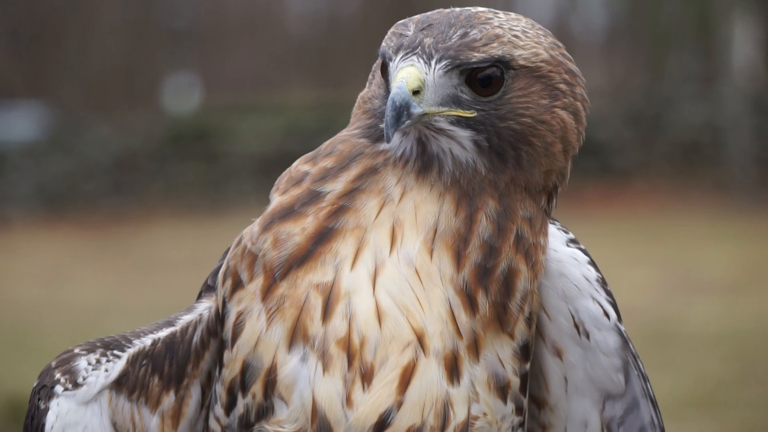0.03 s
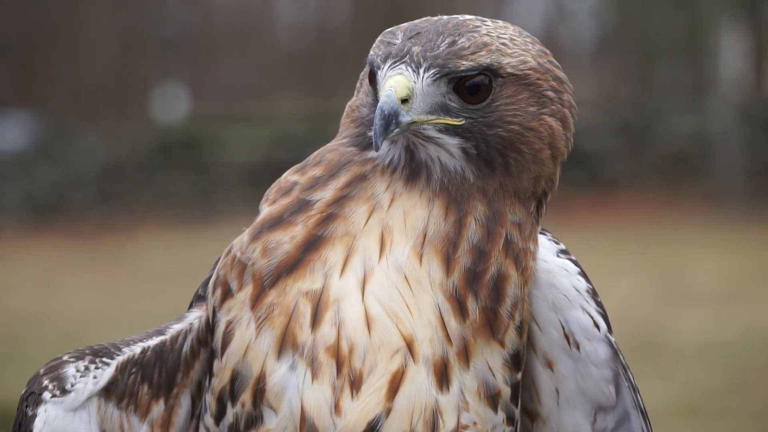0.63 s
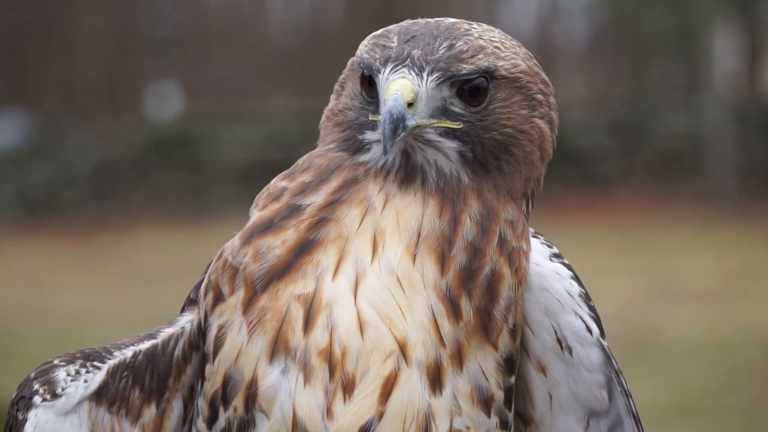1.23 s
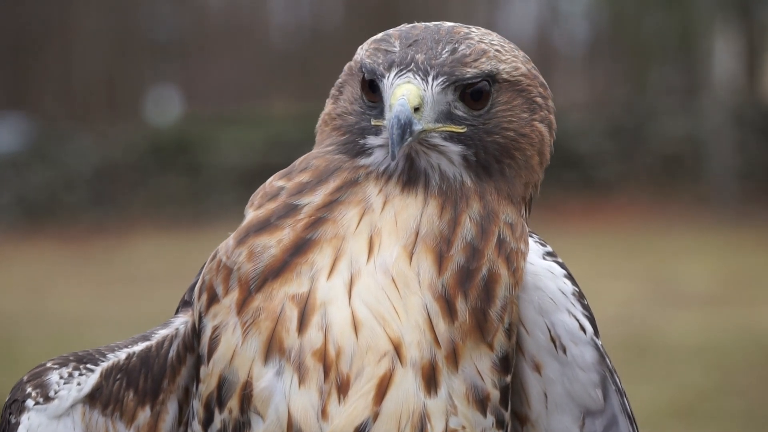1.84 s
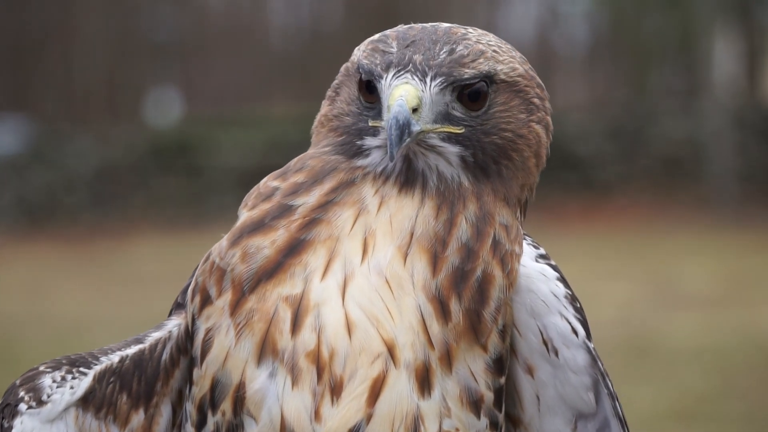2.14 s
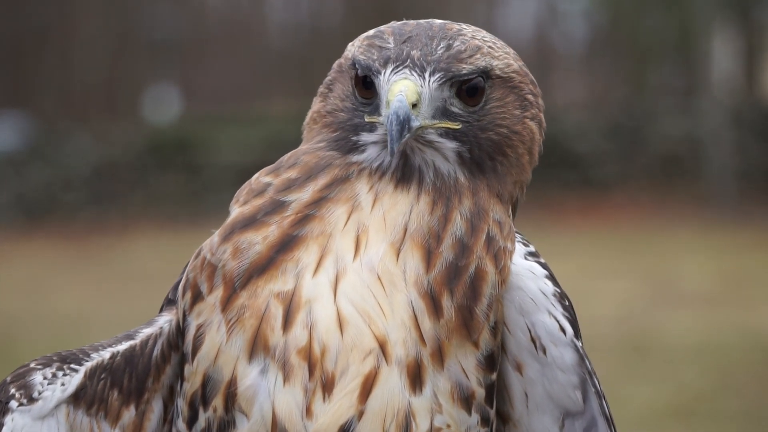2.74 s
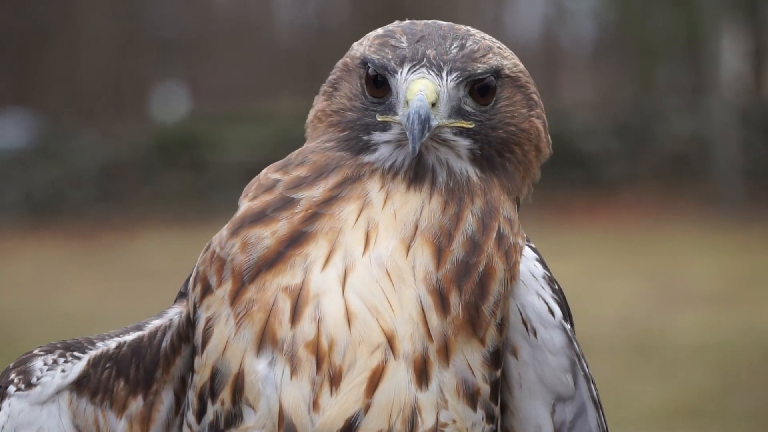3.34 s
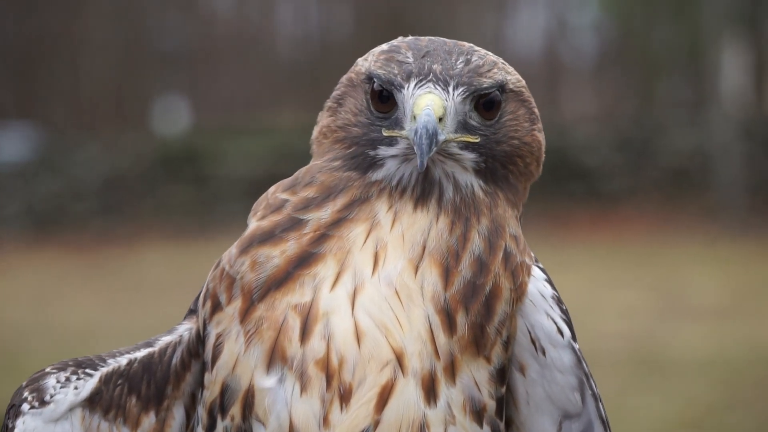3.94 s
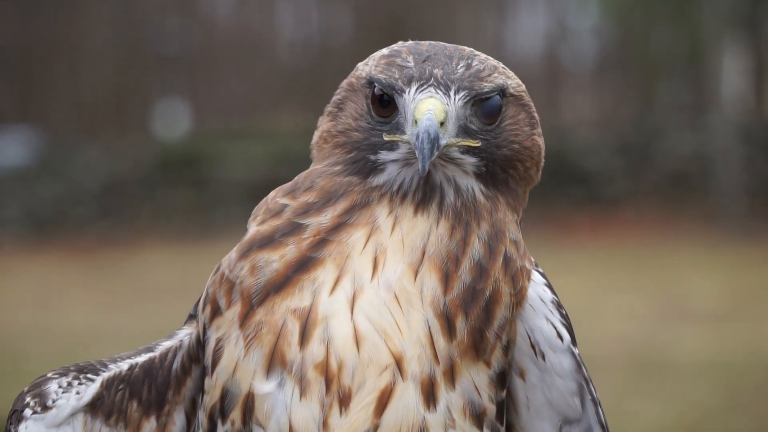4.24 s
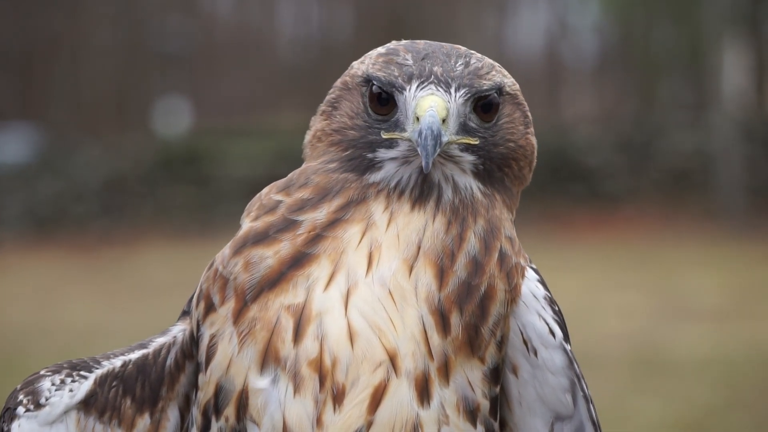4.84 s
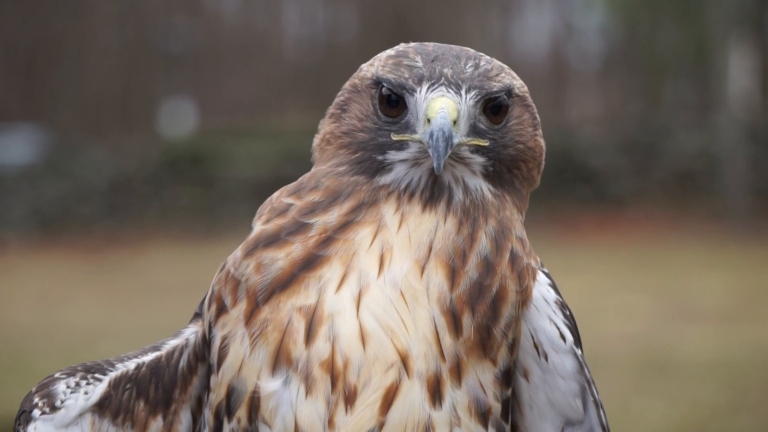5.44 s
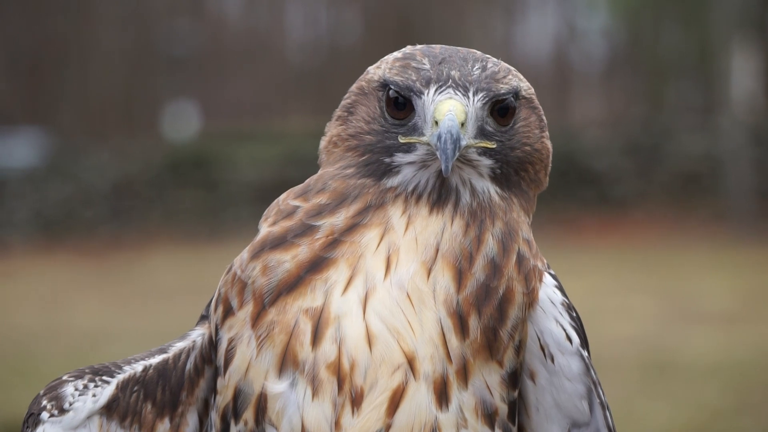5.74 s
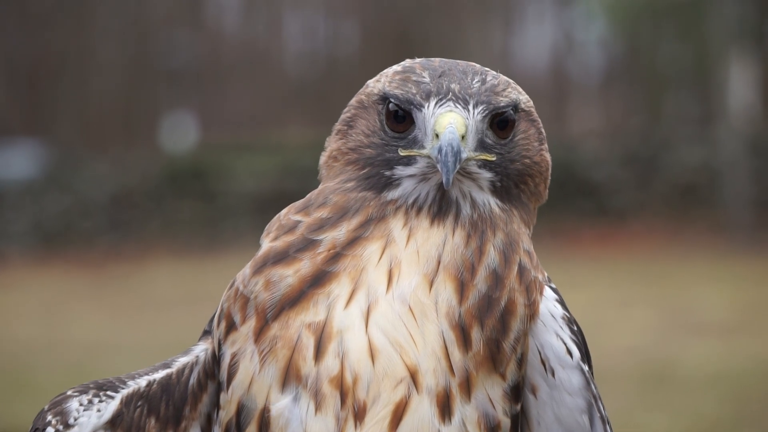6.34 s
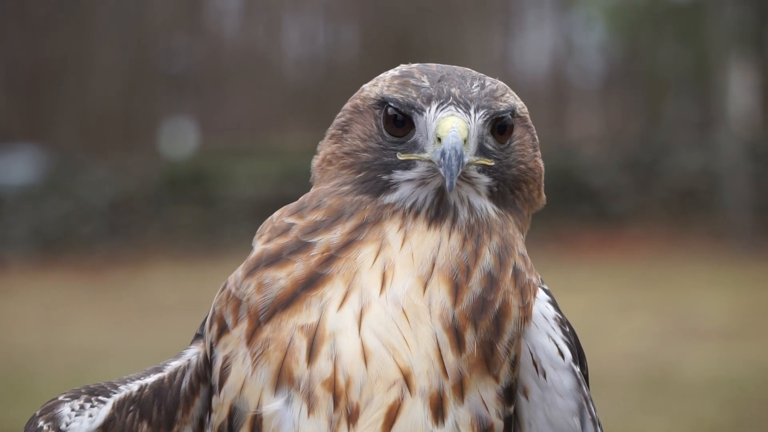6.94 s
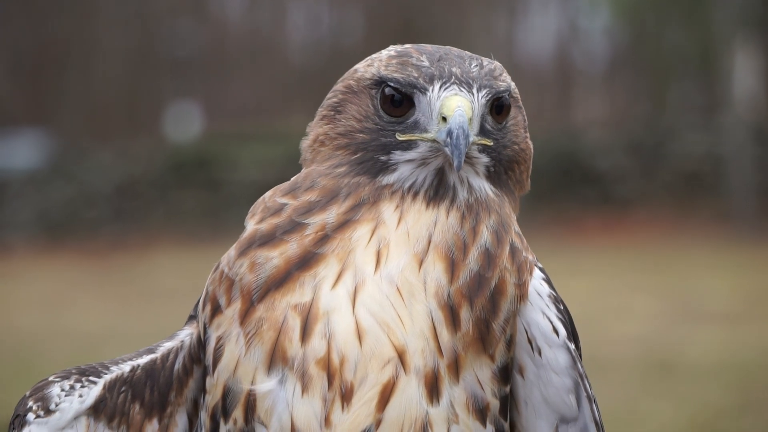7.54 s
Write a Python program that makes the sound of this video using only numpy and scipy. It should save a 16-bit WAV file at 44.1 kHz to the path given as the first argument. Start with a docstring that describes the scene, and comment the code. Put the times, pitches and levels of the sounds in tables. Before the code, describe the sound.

Far traffic hums steadily under a thin high whine, until growing gusts of wind thump and rumble on the microphone.

```python
"""Far traffic and a gusting breeze in a quiet field, on a camera's built-in stereo microphone.
Distant engines rumble and tyres roar. Right at the microphone, the camera whines thinly, its shell
clicks once as the sound fades in, and its lens drive stirs now and then.
The breeze builds until its eddies buffet the two ports, and the last gust ducks the gain control."""
import sys
import numpy as np
from scipy import signal
from scipy.fft import rfft, irfft
from scipy.io import wavfile
from scipy.ndimage import uniform_filter1d

SR = 44100
rng = np.random.default_rng(int(sys.argv[2]) if len(sys.argv) > 2 else 0)


def inscribe(sig):
    """Save sig as 16-bit PCM at rate SR to the path in sys.argv[1].

    A 1-D sig is mono; a 2-D sig holds one channel per row.
    Samples are clipped to [-1, 1] before scaling.
    """
    pcm = np.round(np.clip(np.atleast_2d(sig).T, -1, 1) * 32767)
    wavfile.write(sys.argv[1], SR, pcm.astype(np.int16))


N = 334719
TIME, FREQS = np.arange(N) / SR, np.fft.rfftfreq(N, 1 / SR)


def amp(db):
    """Decibels to gain."""
    return 10 ** (np.asarray(db) / 20)


def unit_rms(x):
    """Scales to rms 1."""
    return x / np.sqrt(np.mean(x ** 2) + 1e-20)


def curve_at(points, hz):
    """Reads a table on a log-frequency axis."""
    f, value = np.transpose(points)
    return np.interp(np.log(hz + 1), np.log(f + 1), value)


def smooth(x, seconds):
    """Triangular running mean."""
    size = max(1, int(seconds * SR))
    return uniform_filter1d(uniform_filter1d(x, size), size)


def coloured(x, spectrum):
    """Filters x by a table of f/Hz, level/dB and scales it to rms 1."""
    return unit_rms(irfft(rfft(x) * amp(curve_at(spectrum, FREQS)), N))


def noise_band(hz, half_width_hz):
    """Noise ringing in one resonance."""
    return unit_rms(irfft(rfft(rng.standard_normal(N)) / (1 + ((FREQS - hz) / half_width_hz) ** 2), N))


def stft_grid(size):
    """Times and frequencies of the short-time spectra."""
    hop = size // 4
    return np.arange(N // hop + 5) * hop / SR, np.fft.rfftfreq(size, 1 / SR)


def port_noise(shape_db, coherence, size):
    """Noise of rms 1 at the two microphone ports, from frames x bins levels and a coherence per bin."""
    a, b, c, d = rng.standard_normal((4, *shape_db.shape))
    coherence = np.clip(coherence, -1, 1)
    mid = np.sqrt(1 + coherence) * (a + 1j * b)
    side = np.sqrt(1 - coherence) * (c + 1j * d)
    spectra = np.array([mid + side, mid - side]) * amp(shape_db)
    _, noise = signal.istft(spectra.transpose(0, 2, 1), nperseg=size, noverlap=size - size // 4)
    return unit_rms(noise[:, :N])


# far traffic across the field: f/Hz, relative level/dB
TRAFFIC_SPECTRUM = [(10, -18.5), (38, -1), (70, -2), (130, -8.5), (230, -7.5), (300, -16), (540, -23.5),
                    (930, -19.5), (1400, -26.5), (3100, -42), (9000, -45.5), (11700, -76)]
# its likeness at the two ports: f/Hz, coherence
TRAFFIC_COHERENCE = [(25, 1), (150, 1), (290, 0.91), (640, 0.55), (1400, 0.3), (3000, -0.25), (7000, -0.13),
                     (15000, -0.35)]
# its lean in the stereo image: f/Hz, left minus right/dB
TRAFFIC_BALANCE = [(250, 0), (700, -1.5), (1300, -2.5), (2300, -3), (4400, 0.5), (15000, -1)]
# distant engines: f/Hz, half-width/Hz, level/dB
ENGINE_DRONES = [(76, 8.7, -48), (240, 4.5, -51), (602, 5, -71.5), (1380, 10, -71.5)]


def traffic(roar_db=-40, patchy_db=0.8, swell_db=0.3):
    """Far engine rumble and tyre roar, drifting in patches as the air carries them."""
    t, hz = stft_grid(size=4096)
    patches = uniform_filter1d(rng.standard_normal((len(t), len(hz))), size=6, axis=0)
    patches = unit_rms(uniform_filter1d(patches, size=30, axis=1))
    swell = unit_rms(uniform_filter1d(rng.standard_normal(len(t)), size=10))[:, None]
    drift_db = (patchy_db * patches + swell_db * swell) / (1 + (hz / 2500) ** 4)  # the treble stays even
    roar = port_noise(curve_at(TRAFFIC_SPECTRUM, hz) + drift_db, curve_at(TRAFFIC_COHERENCE, hz), 4096)
    lean_db = curve_at(TRAFFIC_BALANCE, FREQS) / 2
    drone = sum(amp(db) * noise_band(f, width) for f, width, db in ENGINE_DRONES)
    return amp(roar_db) * irfft(rfft(roar) * amp([lean_db, -lean_db]), N) + drone


# frame tick inside the camera: f/Hz, relative level/dB
TICK_SPECTRUM = [(3000, -45), (9000, -23), (10200, -5), (11500, -31), (14000, -15), (14450, 2),
                 (15700, -11)]


def electronics(frame_hz=59.94, whine_hz=13606, whine_db=-65, tick_db=-70.5, hiss_db=-62):
    """Each picture frame starts with a tick and a burst of whine, over the microphone's steady hiss."""
    frame_phase = TIME * frame_hz % 1
    gate = smooth(1. * ((frame_phase > .05) & (frame_phase < .64)), .0008)
    whine = unit_rms(gate * np.sin(2 * np.pi * whine_hz * TIME)) + .5 * noise_band(whine_hz, 130)
    whine = whine * amp([[-13], [0]])  # whine and ticks sit to the right
    frame_starts = 1. * (np.diff(frame_phase, prepend=0) < 0)
    ticks = coloured(frame_starts, TICK_SPECTRUM) * amp([[-7], [0]])
    hiss_spectrum = [(7000, -25.5), (9500, -2.5), (12500, -0.5), (15700, -1.5)]
    hiss = coloured(rng.standard_normal((2, N)), hiss_spectrum)
    return amp(whine_db) * whine + amp(tick_db) * ticks + amp(hiss_db) * hiss


# modes of the shell around the microphone: f/Hz, left gain/dB, right gain/dB, t60/s
SHELL_MODES = [(1250, -13, -18, .014), (1900, -14, -12, .006), (2590, -13, -2, 0.0062),
               (3650, -11, 0, 0.0059), (6500, 0, -4, 0.0068), (7600, 0, 3, 0.0039), (9200, -13, -4, 0.0027),
               (12400, -8, 10, 0.002), (14600, -7, 3, .0025)]


def click(at_s=.1931, level_db=-32.5, bounce_s=0.000644, bounce_force=0.27):
    """A catch on the camera snaps and bounces once, ringing the plastic shell."""
    out = np.zeros((2, N))
    for start, force in ((at_s, 1), (at_s + bounce_s, bounce_force)):
        t = np.clip(TIME - start, 0, .1)
        for hz, left_db, right_db, t60 in SHELL_MODES:
            ring = np.sin(2 * np.pi * hz * t) * np.exp(-np.log(1000) * t / t60)
            out += force * amp([[left_db], [right_db]]) * ring
    return amp(level_db) * out


# faint lens moves beside the microphone: t/s, length/s, rasp level/dB, rasp f/Hz, body f/Hz
LENS_STIRS = [(.874, 0.04, -60, 12600, 2700), (2.23, .05, -63, 12400, 2500), (2.85, .15, -66, 11200, 3900),
              (4.94, .14, -66, 11200, 3900), (5.805, .07, -60.5, 10100, 4180),
              (6.904, 0.15, -65, 11200, 3900)]


def lens(quick_s=0.057, rasp_half_width_hz=1800, body_half_width_hz=950, body_share=0.69):
    """Short soft rasps of the lens drive; the quicker the stir, the harsher."""
    out = np.zeros((2, N))
    for at_s, length, db, rasp_hz, body_hz in LENS_STIRS:
        stroke = np.exp(-(2 * (TIME - at_s) / length) ** 2)
        harshness = quick_s / length
        for channel in out:
            rasp = noise_band(rasp_hz, harshness * rasp_half_width_hz)
            body = harshness * body_share * noise_band(body_hz, body_half_width_hz)
            channel += amp(db) * stroke * (rasp + body)
    return out


STRONG_GUST_DB = -15.5  # gust timing and eddy pitch are scaled from this level
# gusts at the microphone: arrival t/s, hold/s, level/dB
WIND_GUSTS = [(4.056, .11, -34), (4.459, 0.15, -30.5), (4.83, 0.44, -34), (5.399, 0.25, -29),
              (5.993, 0.049, -32.5), (6.899, 0.097, -26), (7.115, 0.12, -17), (7.308, .042, -11.5),
              (7.383, 0.071, -14.5), (7.514, 0.1, -20.5)]


def wind_strength(t, breeze_db=-43, start_s=2.3, build_s=0.91, attack_s=0.018, release_s=0.033):
    """A faint breeze builds and steadies; gusts swell, hold and die away on top of it."""
    breeze = amp(breeze_db) * np.clip((t - start_s) / build_s, .1, 1)
    power = breeze ** 2
    for arrival, hold, db in WIND_GUSTS:
        slowing = 2 ** (0.0728 * (STRONG_GUST_DB - db))  # gentler gusts come and go more slowly
        before, after = np.maximum(arrival - t, 0), np.maximum(t - arrival - hold, 0)
        gust = amp(db) * np.exp(-(before / attack_s + after / release_s) / slowing)
        power += gust ** 2
    return np.sqrt(power)


def gust_fronts(t, lag_s=0.017, width_s=0.028, octaves=0.24):
    """Pitch rise in octaves from the smaller eddies at the front of each gust."""
    return octaves * sum(np.exp(-((t - at_s - lag_s) / width_s) ** 2) * min(amp(db - STRONG_GUST_DB), 1)
                         for at_s, _, db in WIND_GUSTS)


# buffeting on the microphone in a strong gust: f/Hz, relative level/dB
BUFFET_SPECTRUM = [(10, -30), (22, -10), (70, 2.5), (140, 1.5), (255, -8.5), (455, -24), (680, -40),
                   (1000, -44), (2000, -96)]
# direction of the breeze: t/s, eddy travel time from left port to right/s
PORT_CROSSING = [(4.5, -.0004), (5.5, .0002), (6.8, 0.0013), (7.4, .0012), (7.52, -0.00088)]


def wind(octaves_per_db=0.0571, shared_below_hz=700, low_cut_hz=32, eddy_s=0.021, veer_s=0.001):
    """Eddies sweep over one port and then the other; faster air makes smaller, higher eddies."""
    t, hz = stft_grid(size=1024)
    octaves = octaves_per_db * (20 * np.log10(wind_strength(t)) - STRONG_GUST_DB) + gust_fronts(t)
    shape_db = curve_at(BUFFET_SPECTRUM, hz / 2 ** octaves[:, None])
    coherence = 1 / (1 + (hz / shared_below_hz) ** 2)  # small eddies reach one port only
    eddies = port_noise(shape_db, coherence, size=1024)
    eddies = signal.sosfilt(signal.butter(2, low_cut_hz, "high", fs=SR, output="sos"), eddies)
    eddies /= np.sqrt(smooth((eddies ** 2).mean(0), eddy_s) + 1e-9)  # wind strength alone sets the level
    left, right = wind_strength(TIME) * eddies + thumps()
    veer = unit_rms(smooth(rng.standard_normal(N), 0.058))
    delay = np.interp(TIME, *np.transpose(PORT_CROSSING)) + veer_s * veer
    return np.array([np.interp(TIME + delay / 2, TIME, left), np.interp(TIME - delay / 2, TIME, right)])


# single large eddies on the microphone: t/s, envelope level/dB, f/Hz
LARGE_EDDIES = [(3.954, -23, 65), (4.467, -22, 85), (4.564, -20.5, 95), (5.173, -23.5, 115),
                (5.565, -21, 140), (6.151, -22, 66), (6.767, -20, 60), (6.865, -14, 80), (7.114, -12, 91),
                (7.405, -5.5, 240), (7.463, -11.5, 85)]


def thumps(width_cycles=0.56):
    """A large eddy sucks at the ports and then pushes."""
    out = np.zeros(N)
    for at_s, db, hz in LARGE_EDDIES:
        cycles = (TIME - at_s) * hz
        out += amp(db) * np.sin(2 * np.pi * cycles) * np.exp(-(cycles / width_cycles) ** 2)
    return out


def scene():
    """The far road, the wind on the microphone and the camera's own noises, in stereo."""
    return traffic() + wind() + electronics() + click() + lens()


def record(dry, limit_db=-18.5, squeeze=.95, attack_s=0.015, recover_db_per_s=18, edge_hz=15760):
    """The camera's input fades in, its gain control ducks under strong gusts, and the top is cut."""
    fade_in = 1 - np.exp(-np.maximum(TIME - 0.045, 0) / 0.094)
    power_db = 10 * np.log10(abs(smooth((dry ** 2).mean(0), 0.014)) + 1e-12)
    recovery_db = TIME * recover_db_per_s
    held_db = np.maximum.accumulate(power_db + recovery_db) - recovery_db
    over_db = np.maximum(held_db - limit_db, 0)
    lag = np.exp(-1 / (attack_s * SR))  # the gain comes down a little late
    duck_db = squeeze * signal.lfilter([1 - lag], [1, -lag], over_db)
    low_pass = signal.firwin(1501, edge_hz, window=("kaiser", 9), fs=SR)
    return signal.oaconvolve(dry * fade_in / amp(duck_db), low_pass[None], "same")


dry = scene()
out = record(dry)
inscribe(out)
```